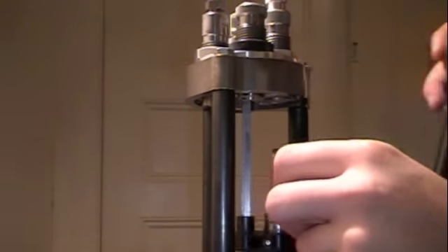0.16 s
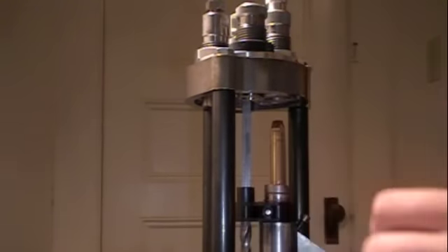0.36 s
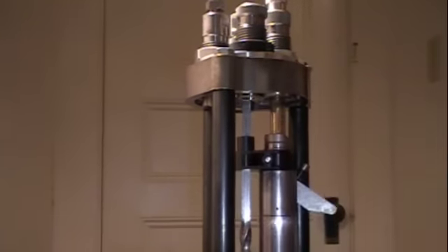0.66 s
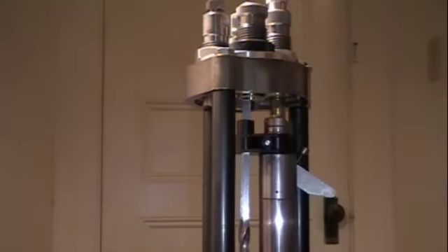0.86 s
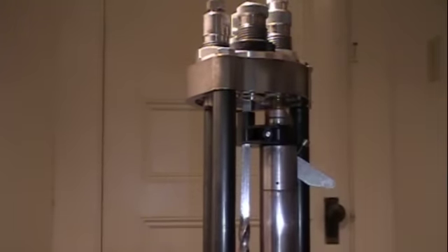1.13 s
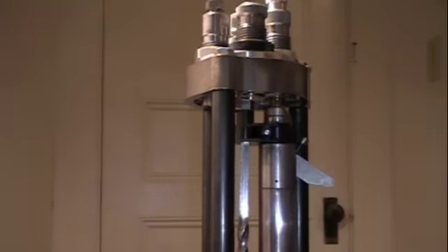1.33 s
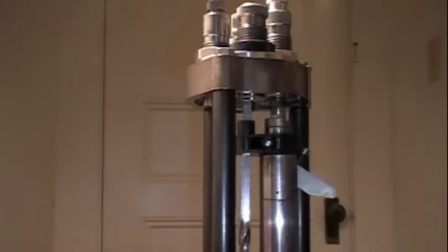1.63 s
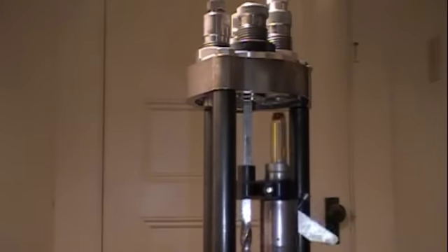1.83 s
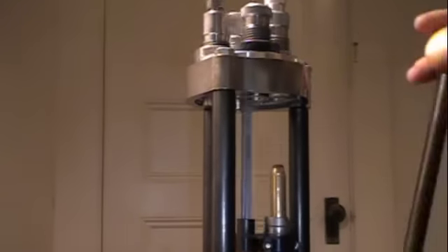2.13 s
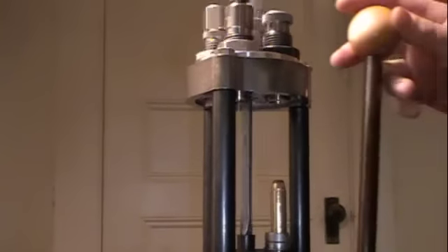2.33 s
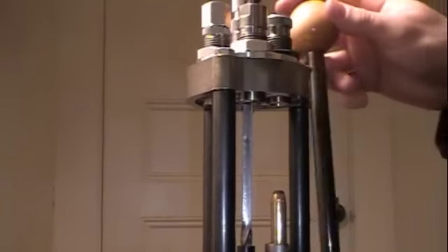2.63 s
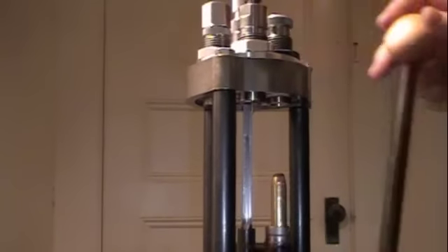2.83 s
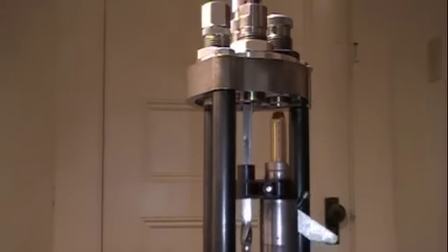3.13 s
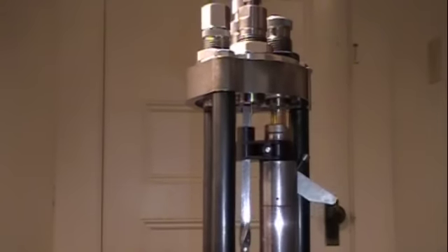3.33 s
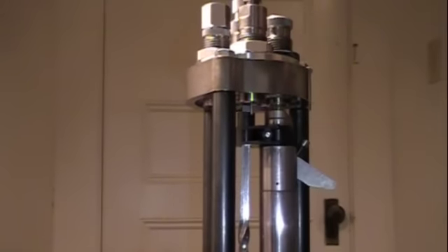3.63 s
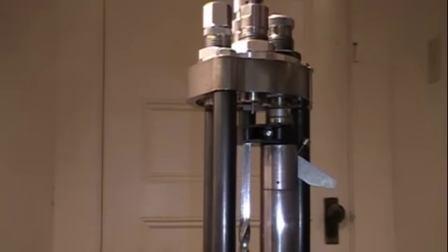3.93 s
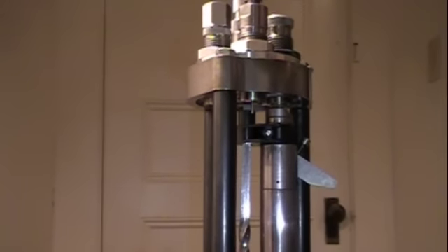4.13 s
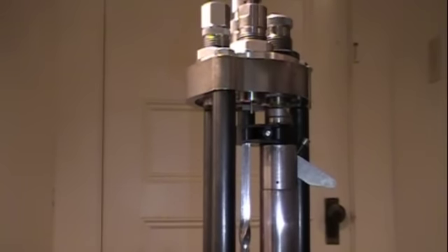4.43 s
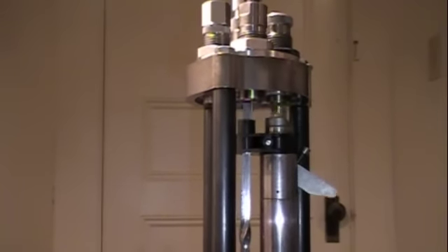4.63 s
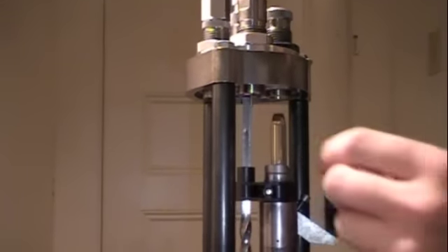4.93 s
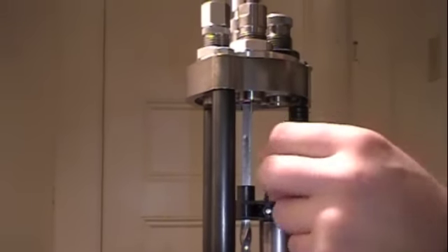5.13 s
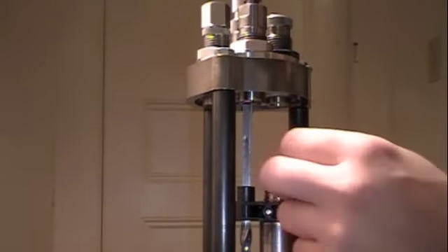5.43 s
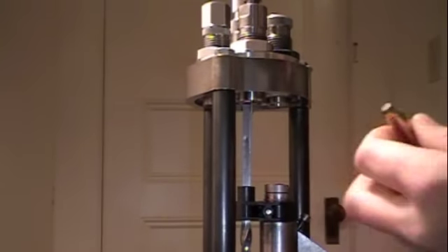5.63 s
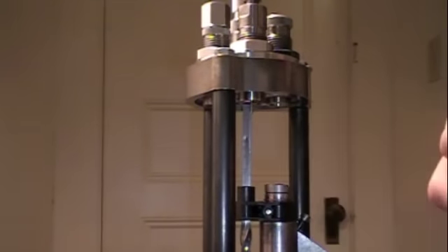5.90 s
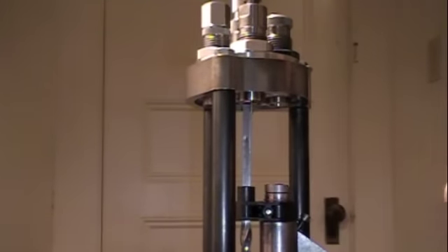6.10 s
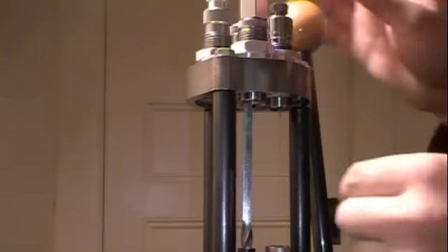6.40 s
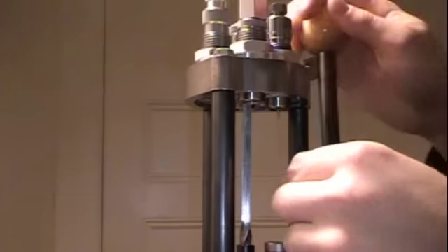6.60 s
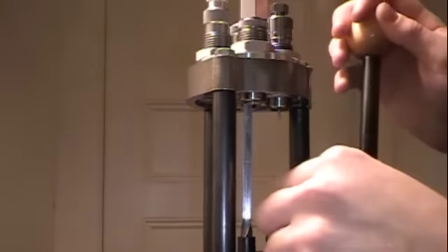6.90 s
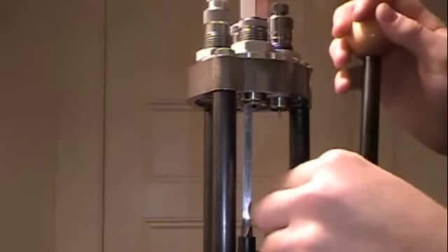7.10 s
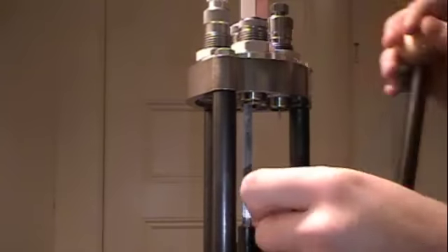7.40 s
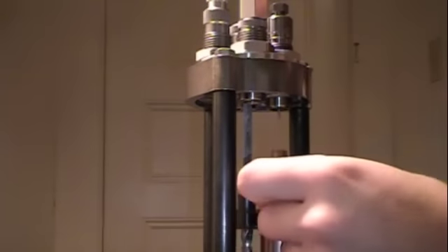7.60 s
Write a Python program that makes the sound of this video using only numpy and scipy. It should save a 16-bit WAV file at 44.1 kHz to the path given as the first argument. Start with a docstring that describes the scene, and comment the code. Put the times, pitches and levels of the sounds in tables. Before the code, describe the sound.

Close-up in a small, lightly reverberant room with low hiss, a hand lever press is worked. From 0 to 0.5 s a thin arm pings, steel clacks sharply, and the arm drops, bouncing ever faster. A hard clack at 0.86 is followed by faint linkage ticks, a thud at 1.3 and crackly crunching to 1.5. Near 1.7 to 2.2 there is a clack, faint ram hiss, then a ping and paired thuds; the turret rubs and ticks round, stopping with a strong thud at 2.5. A bright ringing flick at 2.9 joins heavy clacks and another bouncing drop at 3.1. A ringing knock at 3.57, thud and creaky ticks around 4, and clustered knocks at 4.5 follow. From 5 to 6.3 it is quiet, with light brass scratches. The sound dips briefly at 6.4; soft handling rumble, faint pings and scratching lead to loud clacks and a bouncing drop at 7.4 to 7.75.

```python
"""A hand-operated reloading press is worked on a bench in a small room, close to the microphone.
The primer arm is flicked and pings, steel parts clack as damped modes, the arm drops and bounces to rest.
Under load the linkage ticks in slips, stops thud, cases crunch, the ram hisses and the turret rubs round.
More clacks, pings and drops follow; later cases scratch in grains, the level dips and hands shift their
grip in a soft rumble, then the last pings, clacks and a drop are heard. Room tone lies under it all."""
import sys
import numpy as np
from scipy import signal
from scipy.fft import rfft, irfft, next_fast_len
from scipy.io import wavfile

SR = 44100
rng = np.random.default_rng(int(sys.argv[2]) if len(sys.argv) > 2 else 0)


def bounce(signal):
    """Save signal as a 16-bit WAV file at the path given by the first command-line argument."""
    frames = np.transpose(np.atleast_2d(signal))
    limited = np.clip(frames, -1, 1)
    pcm = np.round(limited * 32767).astype(np.int16)
    wavfile.write(sys.argv[1], SR, pcm)


N = 341775
TIME = np.arange(N) / SR
AGE = TIME[:SR // 3]   # time since a contact, s

# primer arm flicks: t/s, ring level/dB, time until damped/s, release click level/dB
FLICKS = [(0.05, -30, 0.096, -27.5), (2.102, -20.5, 0.016, -22), (2.903, -16, 0.001, -18.5),
          (6.657, -33, 0.0098, -23), (6.805, -35, 0.046, -40), (7.34, -35, 0.0031, -29.5),
          (7.422, -33, 0.022, -38.5), (7.4497, -21.5, 0.004, -19)]
# steel on steel: t/s, level/dB, hardness/dB, lag of second strike/s (0: none)
CLACKS = [(0.1226, -17.5, -1.5, 0.00084), (.189, -11.5, -10.5, 0.012), (0.3505, -12.5, 0.5, 0.013),
          (0.701, -27.5, 1.5, 0), (0.863, -13, 3.5, 0.006), (1.5033, -19.5, -3.5, 0.029),
          (1.7271, -24.5, 0.5, 0), (2.839, -28, 4.5, 0.0026), (2.951, -12.5, -0.5, 0),
          (3.053, -21, 6, 0.00028), (3.061, -11.5, -0.5, 0), (3.5682, -13, 0.5, .007), (4.4762, -13, -4, 0),
          (4.5077, -13.5, -1.5, 0.021), (4.567, -30.5, 15.5, 0), (5.1695, -35, 0.5, .055),
          (5.44, -32.5, -3.5, .0041), (7.209, -37.5, 5, 0), (6.917, -29, 2, 0.00032),
          (7.5107, -10, -3, .012), (7.6422, -13.5, -3, 0.0085)]
# dull stops of ram, turret and handle: t/s, level/dB, hardness/dB, whole-bench shake re level/dB
THUDS = [(1.2867, -15.5, 8, -4), (1.952, -32.5, -4.5, -33), (2.161, -17, -0.5, -36), (2.189, -18, -2, -15),
         (2.308, -27.5, -2, -28.5), (2.524, -12.5, -5.5, -18), (2.562, -27.5, 6.5, -14.5),
         (3.9083, -21.5, 5, 1.5), (4.5632, -19.5, 4, -4.5), (5.037, -45.5, -1, 7), (6.575, -41.5, 4, 6)]
# ram at top of stroke: t/s, bench shake level/dB, handle rod hum level/dB
RAM_TOPS = [(.865, -34.5, -38), (3.569, -38, -48.5)]
# resonances of the arm's stop: f/Hz, width/Hz, relative level/dB
STOP_MODES = [(1027, 23, -18), (1590, 130, 0.5), (2290, 140, -0.5), (2764, 68, -2), (3275, 64, -6),
              (4000, 64, -13), (6200, 350, 11)]
# spectrum of room tone and of the thumps' dense part: f/Hz, relative density/dB
ROOM_COLOUR = [(15, -56), (25, -20), (161, -6), (430, -8.5), (677, -12.5), (2350, -23.5), (16000, -45)]
TURN_S = 2.333   # turret turns


def from_db(db):
    """Decibels to gain."""
    return 10 ** (np.asarray(db) / 20)


def rms_one(x, size=None):
    """Scale so that the first `size` samples have rms 1."""
    return x / np.sqrt(np.mean(x[..., :size] ** 2) + 1e-20)


def at_hz(points, hz):
    """Read a spectrum on a log-frequency axis."""
    freqs, values = np.transpose(points)
    return np.interp(np.log(hz + 1), np.log(freqs), values)


def band(x, low_hz, high_hz):
    """Causal band-pass."""
    edges_hz = [low_hz, min(high_hz, SR / 2 - 500)]
    return signal.sosfilt(signal.butter(3, edges_hz, "band", fs=SR, output="sos"), x)


def noise(colour, shape):
    """Rows of coloured noise, rms 1 overall."""
    size = next_fast_len(shape[-1])
    white = rfft(rng.standard_normal((*shape[:-1], size)))
    gain = from_db(at_hz(colour, np.fft.rfftfreq(size, 1 / SR)))
    return rms_one(irfft(white * gain, size)[..., :shape[-1]])


def stereo(mid, side, side_db):
    """Left and right from a common and an opposed part."""
    return mid + from_db(side_db) * np.array([side, -side])


def swell(s, half_s):
    """Gaussian envelope of height 1, falling to 1/e at half_s."""
    return np.exp(-np.minimum(((TIME - s) / half_s) ** 2, 50))


def strokes_gain(strokes):
    """Sum of swells, one per row: middle/s, half length/s, level/dB."""
    return sum(swell(s, half_s) * from_db(db) for s, half_s, db in strokes)


def place(times, levels_db, sounds):
    """Lay one stereo sound per event on the time line."""
    out = np.zeros((2, N + len(AGE)))
    for k, (s, db) in enumerate(zip(times, levels_db)):
        start = int(np.clip(s * SR, 0, N))
        out[:, start:start + len(AGE)] += from_db(db) * sounds[:, k]
    return out[:, :N]


def each_rms_one(sounds, size):
    """Scale each stereo event to rms 1 over its first `size` samples."""
    return sounds / np.sqrt(np.mean(sounds[..., :size] ** 2, axis=(0, 2), keepdims=True))


def struck(modes, colour, count, low_hz, high_hz, crack_t60, dense_db, tail_t60, tail_db,
           side_db, size, linger_db, rise_hz=0, contact_s=.0002):
    """Stereo responses to `count` blows: damped modes, a crack of dense overtones, a weak tail of both."""
    hz, width_hz, mode_db = np.transpose(modes)[:, :, None]
    tail = from_db(-60 * AGE / tail_t60)
    # energy returning from the rest of the frame keeps the modes alive, the high ones less long
    linger = from_db(linger_db) * tail ** np.maximum(hz / 3000, 1)
    decay = np.exp(-np.pi * width_hz * AGE) + linger
    rings = from_db(mode_db) * np.exp(2j * np.pi * hz * AGE) * decay
    # every contact drives the modes differently
    shape = (2, count, len(modes))
    drive = from_db(2 * rng.standard_normal(shape)) * np.exp(2j * np.pi * rng.random(shape))
    # one random shift per blow, common to its modes
    shift_hz = rise_hz + np.median(width_hz) / 2 * rng.standard_normal(count)
    shifted = (drive @ rings) * np.exp(2j * np.pi * shift_hz[:, None] * AGE)
    tones = rms_one(shifted.imag, size)
    crack_fade = from_db(-60 * AGE / crack_t60) + from_db(tail_db) * tail
    dense = rms_one(noise(colour, tones.shape) * crack_fade, size)
    attack = 1 - np.exp(-AGE / contact_s)
    mid, side = band((tones + from_db(dense_db) * dense) * attack, low_hz, high_hz)
    return each_rms_one(stereo(mid, side, side_db), size)


def scratch(strokes, modes, per_s, spread_db=3):
    """Sliding or rattling metal catches in random grains that excite each resonance independently."""
    grain_db = spread_db * np.minimum(rng.exponential(1, N), 2)
    catches = (rng.random(N) < per_s / SR) * from_db(grain_db)
    rings = 0
    for hz, width_hz, db in modes:
        peak = np.concatenate(signal.iirpeak(hz, hz / width_hz, fs=SR))
        grains = catches * rng.standard_normal((2, N)) + 1e-18
        rings = rings + from_db(db) * rms_one(signal.sosfilt([peak, peak], grains))
    return rms_one(stereo(*rings, side_db=-11.5)) * strokes_gain(strokes)


def room_tone(level_db=-50.5):
    """Steady coloured noise, louder while the press is worked."""
    # floor level: t/s, change/dB
    stir = [(0, 4.5), (3, 5), (3.8, -0.5), (4.7, 4.5), (5.6, -2), (7.75, -0.5)]
    s, db = np.transpose(stir)
    hiss = rms_one(stereo(*noise(ROOM_COLOUR, (2, N)), side_db=-6.5))
    return from_db(level_db + np.interp(TIME, s, db)) * hiss


def dip(middle_s=6.42, half_s=.085, floor_db=-22):
    """The level dips briefly: straight ramps down to a floor and back."""
    return np.clip(np.abs(TIME - middle_s) / half_s, from_db(floor_db), 1)


def room(x, wet_db=-14.5, wall_s=.0066):
    """Diffuse reflections from near walls: band noise that gets duller with time, wider in the treble."""
    # room decay: f/Hz, t60/s
    decay_t60 = [(250, 0.4), (900, 0.31), (2500, 0.23), (9000, 0.11)]
    response = np.zeros((2, len(AGE)))
    edges_hz = np.geomspace(80, 16000, 8)
    for low, high in zip(edges_hz, edges_hz[1:]):
        hz = np.sqrt(low * high)
        side_db = at_hz([(300, -24.5), (2000, -6)], hz)
        wash = stereo(*band(rng.standard_normal((2, len(AGE))), low, high), side_db=side_db)
        band_db = at_hz([(300, -2.5), (1700, -8.0), (8000, -18.0)], hz)
        response += wash * from_db(band_db - 60 * AGE / at_hz(decay_t60, hz))
    onset = np.clip(AGE / wall_s - .5, 0, 1)   # ramp from 0.5 to 1.5 wall_s
    response *= onset * from_db(wet_db) / np.sqrt(SR / 100)
    return signal.fftconvolve(x.mean(axis=0)[None], response, axes=1)[:, :N]


def swish(s=1.83, half_s=.26, level_db=-62):
    """The oiled ram hisses faintly on its way down: a narrow band of high noise."""
    return rms_one(band(rng.standard_normal((2, N)), 10000, 11600)) * swell(s, half_s) * from_db(level_db)


def handling(s=6.73, half_s=.42, level_db=-49):
    """Hands taking a new grip make a soft, lumpy rumble: narrow low noise, same on both sides."""
    lumps = band(rng.standard_normal(N), 97, 176)
    return rms_one(lumps) * swell(s, half_s) * from_db(level_db)


def case_slides():
    """Cases scratch in their holder; the grains ring the brass."""
    # slides: middle/s, half length/s, level/dB
    slides = [(5.292, 0.012, -39.5), (5.41, 0.063, -43), (7.17, 0.041, -36)]
    # brass case: f/Hz, width/Hz, relative level/dB
    case_modes = [(790, 240, 2.5), (1554, 540, 1), (3400, 3200, -7)]
    return scratch(slides, case_modes, per_s=1300)


def rattles():
    """Loose steel parts rattle: grains ring all stop modes but the last."""
    # rattles: middle/s, half length/s, level/dB
    bursts = [(.52, .026, -31), (2.185, 0.04, -34.5), (2.535, .016, -26), (4.538, 0.018, -23.5)]
    return scratch(bursts, STOP_MODES[:-1], per_s=660)


def crunches():
    """Cases crunch in the die; the grains ring its broad resonances."""
    # crunches: middle/s, half length/s, level/dB
    squeezes = [(1.335, 0.02, -27.5), (1.405, 0.039, -33.5), (3.975, 0.089, -44)]
    # die: f/Hz, width/Hz, relative level/dB
    die_modes = [(2000, 630, 7), (6450, 2600, -1), (9700, 2000, -5.5)]
    return scratch(squeezes, die_modes, per_s=690)


def rub(grain_db=3.5, frame_hz=1700, frame_db=5):
    """Sliding surfaces catch in small grains, ring the frame and rumble through the bench."""
    # sliding parts and fingers: middle/s, half length/s, scrape level/dB
    strokes = [(0.741, 0.055, -36.5), (1.38, 0.066, -41), (3.296, 0.04, -38), (6.585, 0.03, -42.5)]
    # friction noise: f/Hz, relative density/dB
    rub_colour = [(200, -16.5), (300, 10), (800, -2.5), (1600, -8.5), (3500, -26.5), (12000, -40)]
    rumble_db = -6.5   # in a stroke, re scrape
    turn_half_s, turn_rumble_db, turn_scrape_db = .083, -34, -37.5
    flutter = rms_one(band(rng.standard_normal(N), 32, 210))
    grains = rms_one(from_db(grain_db * flutter))
    rumble = rms_one(band(stereo(*noise(rub_colour, (2, N)), side_db=-16.0), 280, 1200))
    friction = band(stereo(*noise(rub_colour, (2, N)), side_db=-9.5), 630, 13000)
    frame_ring = signal.lfilter(*signal.iirpeak(frame_hz, 8, fs=SR), friction)
    scrape = rms_one(friction + from_db(frame_db) * frame_ring)
    slides = strokes_gain(strokes) * (scrape + from_db(rumble_db) * rumble)
    turn = from_db(turn_rumble_db) * rumble + from_db(turn_scrape_db) * scrape
    return grains * (slides + swell(TURN_S, turn_half_s) * turn)


def rod(hz=985, t60=0.7):
    """One long bending mode of the handle hums as the ram tops out."""
    s, _, db = np.transpose(RAM_TOPS)
    hum = np.sqrt(2) * np.sin(2 * np.pi * hz * AGE) * from_db(-60 * AGE / t60)
    return place(s, db, np.broadcast_to(hum, (2, len(s), len(AGE))))


def slips(after_s=.012, after_db=-11):
    """Stick-slip (s, dB): each slip is trailed by two weaker ones as the joint settles."""
    # linkage slips: t/s, relative level/dB
    snaps = [(.993, -39), (1.027, -36), (1.079, -40.5), (1.112, -39), (1.336, -40), (1.3503, -22),
             (1.3988, -28), (1.4481, -23.5), (1.509, -38), (1.581, -40.5), (2.238, -39), (2.290, -40),
             (2.3479, -28), (2.385, -33.5), (2.448, -26), (2.4782, -30.5), (2.563, -38.5), (2.582, -45),
             (2.614, -43), (2.647, -41), (2.7186, -41), (3.953, -42), (3.971, -33.5), (4.031, -28),
             (4.063, -46), (4.083, -25), (4.121, -34), (4.151, -37.5), (4.204, -39), (4.286, -37.5),
             (4.616, -43), (4.833, -42)]
    trailing = [(s + k * after_s * rng.uniform(.8, 1.4), db + k * after_db) for s, db in snaps for k in (1, 2)]
    return snaps + trailing


def creak(left_lead_s=.000028, grit_db=-19, grit_t60=0.019, top_db_per_db=0.87, rise_s=0.0002):
    """Slips of the loaded linkage snap a small steel part into damped modes, with a little grit noise."""
    # linkage: f/Hz, width/Hz, relative level/dB, left-right/dB
    tick_modes = [(5340, 2500, 4, 9), (6820, 750, 11.5, -1.5), (8700, 860, 1.5, 2), (11580, 140, 3.5, 7)]
    s, db = np.transpose(slips())
    hz, width_hz, mode_db, pan_db = np.transpose(tick_modes)[:, :, None]
    drive = from_db(2.5 * rng.standard_normal((len(s), len(hz))))
    # harder slips drive the top mode more
    drive[:, -1] *= from_db(top_db_per_db * (db + 26))
    # modes shift with the point of contact
    hz = hz + width_hz / 4 * rng.standard_normal((*drive.shape, 1))
    sides = []
    for t, lean_db in ((AGE + left_lead_s, pan_db / 2), (AGE, -pan_db / 2)):
        envelope = (1 - np.exp(-t / rise_s)) * np.exp(-np.pi * width_hz * t)
        rings = from_db(mode_db + lean_db) * envelope * np.sin(2 * np.pi * hz * t)
        sides.append(np.sum(drive[..., None] * rings, axis=1))
    snaps = each_rms_one(np.array(sides), 350)
    grit = band(rng.standard_normal(snaps.shape) * from_db(-60 * AGE / grit_t60), 1500, 14000)
    ticks = snaps + from_db(grit_db) * rms_one(grit, size=350)
    return band(place(s, db + 4.0, ticks), low_hz=1500, high_hz=13400)


def holder():
    """The shell holder rings briefly in damped modes when the ram is jolted."""
    # jolts: t/s, level/dB
    jolts = [(.189, -11.5), (.3503, -13), (2.951, -14.5), (3.06, -13.5), (3.5693, -9.5), (4.477, -10.5)]
    # shell holder: f/Hz, width/Hz, relative level/dB
    holder_modes = [(4240, 110, -8), (4600, 130, 0.5)]
    s, db = np.transpose(jolts)
    hz, width_hz, mode_db = np.transpose(holder_modes)[:, :, None]
    hz = hz + width_hz / 2 * rng.standard_normal((len(s), len(hz), 1))
    decay = from_db(mode_db) * np.exp(-np.pi * width_hz * AGE)
    rings = np.sum(decay * np.sin(2 * np.pi * hz * AGE), axis=1)
    return place(s, db, np.array([rings, rings]))


def shakes(clack_db=-22):
    """Every push on the whole bench as (s, dB); it gives a little under every clack."""
    return ([(s, db + shake_db) for s, db, _, shake_db in THUDS] + [(s, db) for s, db, _ in RAM_TOPS]
            + [(s, db + clack_db) for s, db, _, _ in CLACKS])


def thumps():
    """The whole bench gives under a push and rings in its lowest modes."""
    s, db = np.transpose(shakes())
    low_modes = [(114, 29, -7), (252.3, 9, -4.0), (342, 21, -2.5)]   # f/Hz, width/Hz, relative level/dB
    bench = struck(low_modes, ROOM_COLOUR, count=len(s), low_hz=35.6, high_hz=480, crack_t60=0.084,
                   dense_db=-2.5, tail_t60=0.72, tail_db=-15.5, side_db=-14.0, size=900, linger_db=-28.0)
    return place(s, db, bench)


def arm_ring(s, low_db, high_db, free_s, free_t60=0.59, damped_t60=0.059, top_db=-24,
             attack_s=0.00016, rest_db=-24, rest_t60=.14, body_db=-27):
    """Thin steel rings in four partials, trembling on its loose pivot, until a touch damps all but a trace."""
    # partials of body, low, high, top: f/Hz
    arm_hz = [1680, 4221, 8100, 12500]
    buzz_db, wobble_rad, rattle_rad = 1.5, .15, .8   # rattle adds to the wobble once damped
    damping = from_db(-60 * np.maximum(AGE - free_s[:, None], 0) / damped_t60)
    trace = from_db(rest_db - 60 * AGE / rest_t60)
    attack = 1 - np.exp(-AGE / attack_s)
    fade = (from_db(-60 * AGE / free_t60) * damping + trace) * attack
    out = 0
    for hz, db in zip(arm_hz, (high_db + body_db, low_db, high_db, high_db + top_db)):
        loudness, wobble = rms_one(band(rng.standard_normal((2, *fade.shape)), 20, 170))
        # the pivot grips a little differently each time
        pitch_hz = hz * rng.normal(1, .003, (len(s), 1))
        phase = 2 * np.pi * (pitch_hz * AGE + rng.random((len(s), 1)))
        phase = phase + (wobble_rad + rattle_rad * (1 - damping)) * wobble
        ring = np.sqrt(2) * np.sin(phase) * fade * from_db(buzz_db * loudness)
        out = out + place(s, db, np.array([ring, ring * from_db(4.0)]))   # right louder
    return out


ARM_LOW_DB = -8.5   # low partial re high partial


def rebounds(count=8, restitution=.56, loss_db=3.5, chatter_s=.0086):
    """Touches (s, dB) of the dropped arm: flights shrink by a fixed share to a chatter, touches weaken."""
    # drops on the stop: t/s, level/dB, first flight/s
    drops = [(.443, -13, .032), (3.12, -15, .0378), (7.7334, -14, .035)]
    k, touches = np.arange(count), []
    for s, db, first_s in drops:
        flights = np.maximum(first_s * restitution ** k, chatter_s)
        touches += zip(s + np.cumsum(flights) - flights, db - loss_db * k)
    return touches


def bounces(ring_db=-22, ring_s=0.013):
    """The primer arm drops on its stop and rebounds ever sooner, ringing a little at each touch."""
    # dense overtones of the stop: f/Hz, relative density/dB
    stop_colour = [(130, -29), (220, 5), (839, -9.5), (1510, 1.5), (6400, -5.5), (8310, -17), (14000, -48)]
    s, db = np.transpose(rebounds())
    clacks = struck(STOP_MODES, stop_colour, count=len(s), low_hz=240, high_hz=8570, crack_t60=0.011,
                    dense_db=1.0, tail_t60=0.17, tail_db=-24, side_db=-14.0, size=350, linger_db=-35)
    high_db = db + ring_db
    return place(s, db, clacks) + arm_ring(s, high_db + ARM_LOW_DB, high_db, np.full(len(s), ring_s))


def pings():
    """The primer arm is flicked and rings until it is damped."""
    s, db, free_s, _ = np.transpose(FLICKS)
    return arm_ring(s, db + ARM_LOW_DB, db, free_s)


def contacts():
    """Every blow as (s, bench dB, frame dB, steel dB): clacks favour the frame, thuds the bench."""
    second_db = -3                                  # second strike re first
    clack_bench_db, clack_steel_db = -11, -10       # re frame
    flick_bench_db = -5                             # re frame
    thud_frame_db, thud_steel_db = -4.5, -20        # re bench
    rebound_s, rebound_db = .007, -8                # a heavy stop lands twice
    clacks = [(s, db, hard) for s, db, hard, _ in CLACKS]
    clacks += [(s + lag, db + second_db, hard) for s, db, hard, lag in CLACKS if lag > 0]
    thuds = [(s + k * rebound_s, db + k * rebound_db, hard) for s, db, hard, _ in THUDS for k in (0, 1)]
    return ([(s, db + clack_bench_db, db, db + clack_steel_db + hard) for s, db, hard in clacks]
            + [(s, db + flick_bench_db, db, db + clack_steel_db) for s, _, _, db in FLICKS]
            + [(s, db, db + thud_frame_db + hard / 2, db + thud_steel_db + hard) for s, db, hard in thuds])


def knocks(slack_s=.009, slack_db=-19, index_half_s=.36, index_rise_hz=25):
    """Each knock rings the bench, the cast frame and the small steel parts in its own proportion."""
    # resonances of each part: f/Hz, width/Hz, relative level/dB
    bench_modes = [(274.3, 11.3, -3.5), (291, 40.5, 1), (347, 18, -8.5), (454, 38, -5.5), (708, 74, 9),
                   (784, 79, 4.5)]
    frame_modes = [(1428, 50, -1.5), (1500, 55, -4.5), (1693, 61, 0.5), (1847, 55, -2.5), (2116, 110, -2.5),
                   (2282, 160, -3), (2770, 130, -14)]
    steel_modes = [(3818, 210, 4.5), (4700, 160, -2), (5890, 190, -9), (6550, 370, 4)]
    # dense overtones: f/Hz, relative density/dB
    knock_colour = [(100, -34), (170, -21), (284, -3.5), (1230, -6.5), (1700, -6), (2890, -13.5),
                    (5000, -14.5), (12500, -34), (16000, -64)]
    s, bench_db, frame_db, steel_db = np.transpose(contacts())
    # the bench modes are stiffer while the turret is engaged
    rise_hz = index_rise_hz * np.interp(s, TIME, swell(TURN_S, index_half_s))
    bench = struck(bench_modes, knock_colour, count=len(s), low_hz=232, high_hz=966, crack_t60=0.13,
                   dense_db=0, tail_t60=0.23, tail_db=-16.5, side_db=-21.5, size=700, linger_db=-28.5,
                   rise_hz=rise_hz)
    frame = struck(frame_modes, knock_colour, count=len(s), low_hz=900, high_hz=2930, crack_t60=0.041,
                   dense_db=0, tail_t60=0.14, tail_db=-9.0, side_db=-11.5, size=350, linger_db=-26.5)
    steel = struck(steel_modes, knock_colour, count=len(s), low_hz=2980, high_hz=12200, crack_t60=0.027,
                   dense_db=9.5, tail_t60=0.18, tail_db=-16.5, side_db=-11.5, size=350, linger_db=-24.5)
    # play in the joints is taken up with a soft touch before each knock, in another blow's sound
    touch = place(s - slack_s, frame_db + slack_db, np.roll(bench + frame / 2, 1, axis=1))
    low = (place(s, bench_db, bench) + touch) * from_db([[.6], [-.6]])   # leans left
    return low + place(s, frame_db, frame) + place(s, steel_db, steel)


def scene():
    """The press in its room over a low room tone; creaks and crunches are heard only directly."""
    press = (knocks() + holder() + thumps() + bounces() + pings() + rod() + rub() + swish() + handling()
             + case_slides() + rattles())
    return (press + room(press) + creak() + crunches() + room_tone()) * dip()


def record(dry, microphone_hz=13200, cutoff_hz=16000):
    """The microphone rolls off its top, the loudest peaks are rounded and all above the cutoff is removed."""
    roll_off = signal.butter(4, min(microphone_hz, SR / 2 - 500), fs=SR, output="sos")
    heard = signal.sosfilt(roll_off, dry)
    rounded = 1.2 * np.tanh(heard / 1.2)
    return signal.sosfilt(signal.ellip(12, .1, 110, cutoff_hz, fs=SR, output="sos"), rounded)


dry = scene()
out = record(dry)
bounce(out)
```